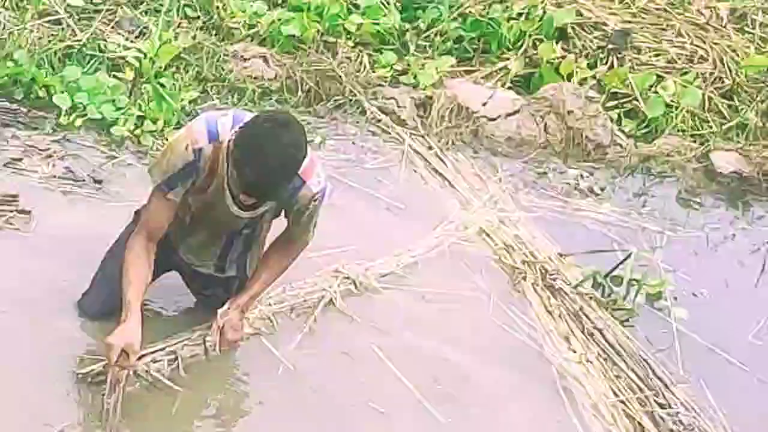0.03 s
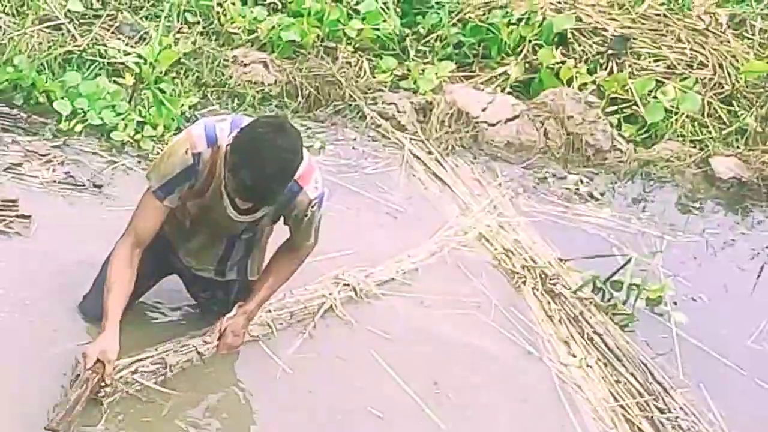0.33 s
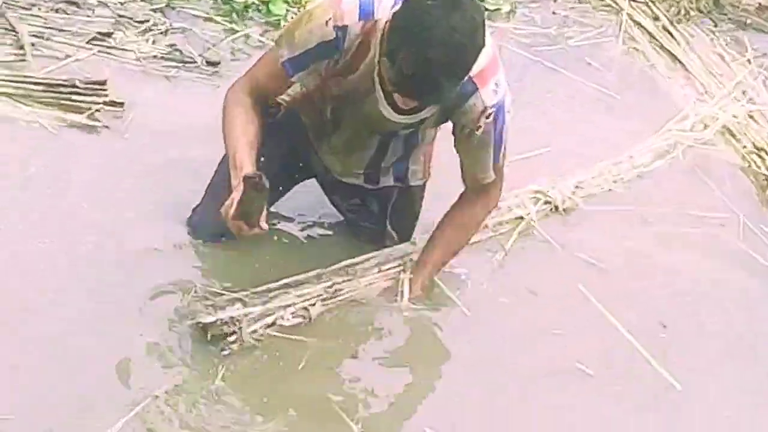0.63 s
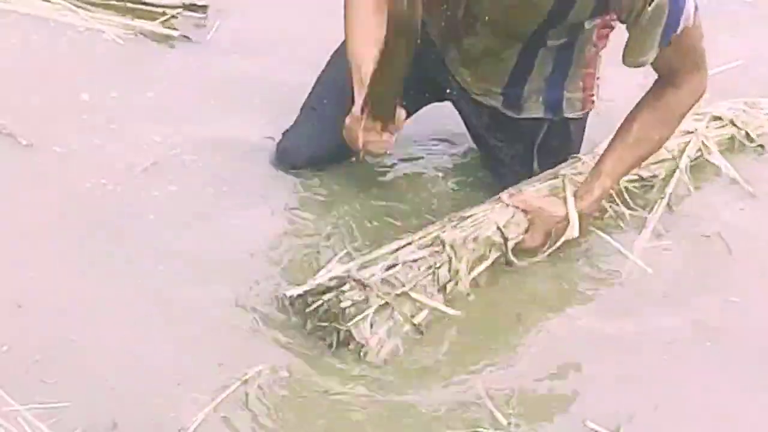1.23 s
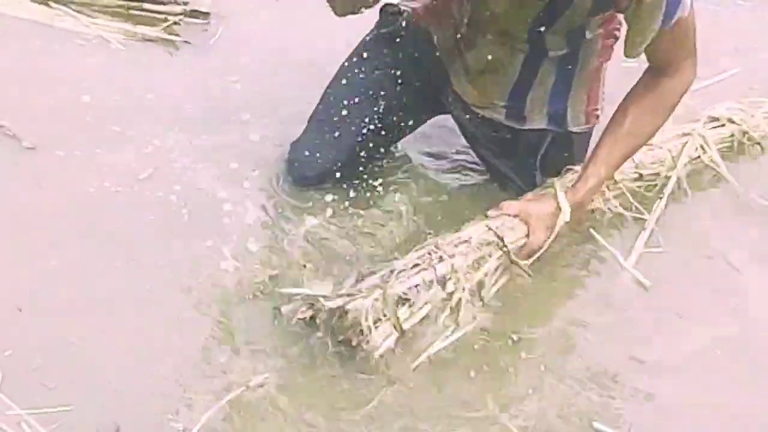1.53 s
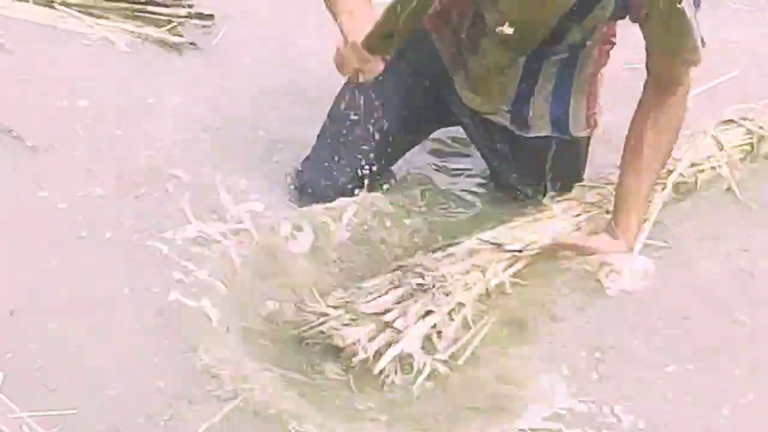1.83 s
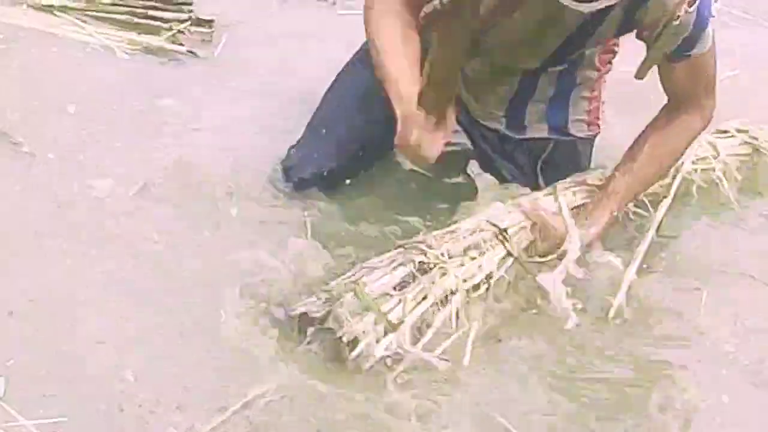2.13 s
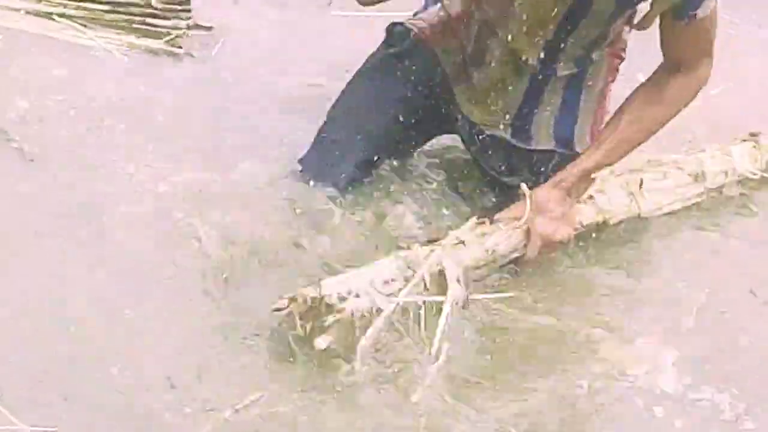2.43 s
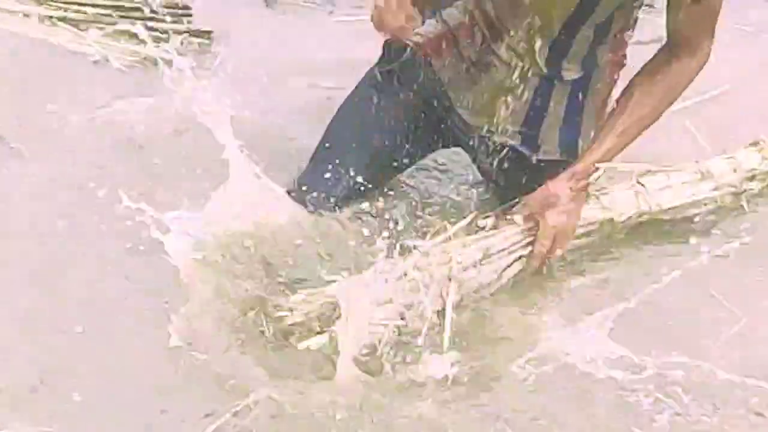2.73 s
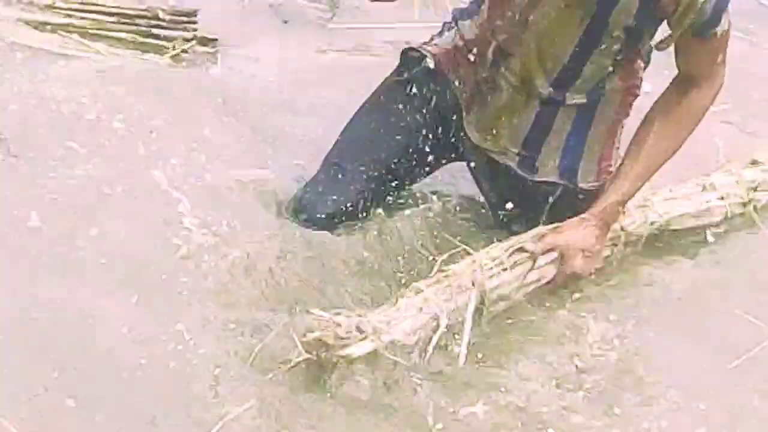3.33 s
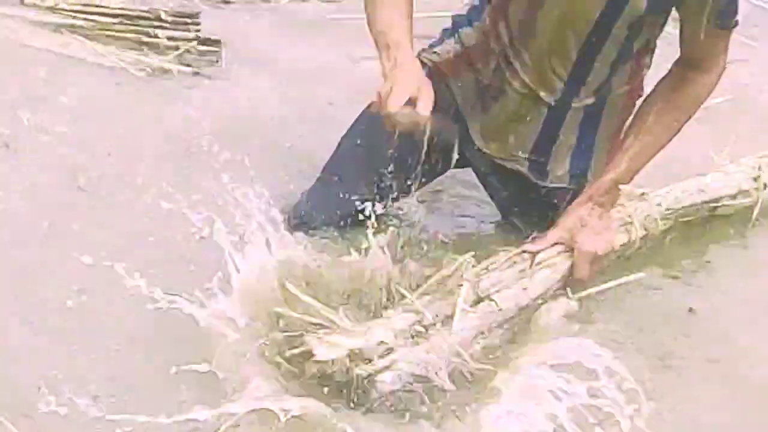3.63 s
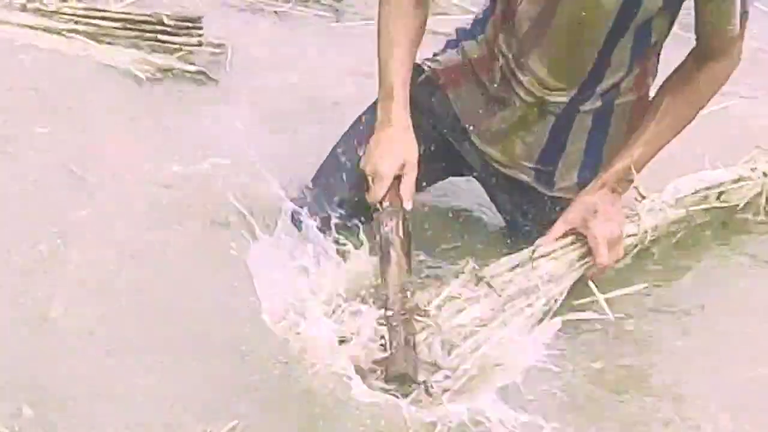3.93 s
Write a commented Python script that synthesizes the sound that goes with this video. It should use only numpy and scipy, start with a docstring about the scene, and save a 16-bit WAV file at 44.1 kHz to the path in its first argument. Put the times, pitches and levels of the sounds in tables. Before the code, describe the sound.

A wooden club whacks a wet bundle of stalks in shallow water seven times, close by outdoors. Each sharp blow throws spray that patters back, and the bundle sloshes between hits. Insects buzz very faintly behind.

```python
"""Clubbing wet stalks in shallow water

A wooden club whacks a wet bundle of stalks seven times, close by. Each blow cracks the stalks,
shoves the water and throws spray that patters back; something far off returns an echo.
Between blows the bundle is turned and sloshes. Two insects buzz on the bank, and a distant bird
calls once over the low rumble of the open air."""
import sys
import numpy as np
from scipy import signal
from scipy.fft import rfft, irfft, next_fast_len
from scipy.io import wavfile
from scipy.ndimage import map_coordinates

SR = 44100
rng = np.random.default_rng(int(sys.argv[2]) if len(sys.argv) > 2 else 0)


def put_to_file(sound):
    """Save the sound as 16-bit audio at rate SR, in the file named by the first command-line argument."""
    columns = np.atleast_2d(sound).T  # one column per channel
    safe = np.clip(columns, -1, 1)
    whole_steps = np.round(safe * 32767)
    wavfile.write(sys.argv[1], SR, whole_steps.astype(np.int16))


N = 176400  # 4 seconds
TOP_HZ = 15900

ATTACK_S, HOLD_S, LEAD_S = 0.00067, 0.0015, 0.0022  # lead: the light touch before the full hit
# Blows of the club: (time [s], water push [dB], air pocket [dB], pocket pitch [Hz],
# wood knock [dB], club pitch [Hz], stalk crack [dB], wet slap [dB])
CLUB_BLOWS = [(1.377, -15.5, -15, 586, -21, 1393, -14.5, -17.5),
              (1.7603, -11, -14, 540, -13, 1483, -15.5, -13), (2.2798, -2, -23, 510, -15.5, 1697, -16, -18),
              (2.6626, -15.5, -14, 714, -16.5, 1622, -15.5, -20),
              (3.2110, -1, -1.5, 579, -16.5, 1535, -13.5, -19.5),
              (3.6090, -4, -6, 552, -22, 1348, -15, -17),
              (3.9766, -15.5, -18.5, 505, -16.5, 1362, -15, -14.5)]
def blows():
    """The club rings, crushes the stalks and shoves the water, which springs back on trapped air."""
    out, t = np.zeros((2, N)), np.arange(SR // 10) / SR - LEAD_S
    push_t = t - 0.00215  # the push peaks just after the hit
    pocket_t = np.maximum(push_t + 0.000065, 0)  # the air starts to ring just before that
    crush = hit_shape(t, fade_s=0.032)
    for s, push_db, pocket_db, pocket_hz, knock_db, club_hz, crack_db, slap_db in CLUB_BLOWS:
        push_shape = np.exp(-abs(push_t) / 0.0011) * ramp(t + LEAD_S, LEAD_S)
        push = amp(push_db) * np.cos(2 * np.pi * 0.52 * pocket_hz * push_t) * push_shape
        pocket = amp(pocket_db) * np.sin(2 * np.pi * pocket_hz * pocket_t) * fade(pocket_t, 0.019)
        # The club's own note shifts with the point of contact.
        ring = amp(knock_db + 4) * np.sin(2 * np.pi * club_hz * t) * hit_shape(t, fade_s=0.023)
        hit = band(push - pocket, 122.6, 5500) + ring
        for low_hz, high_hz, db in [(610, 2210, knock_db), (2490, 5740, crack_db), (7500, 15000, slap_db)]:
            burst = band(stalks(crush), low_hz, high_hz)
            hit = hit + amp(db) * burst * np.linalg.norm(crush) / np.linalg.norm(burst.mean(0))
        add(out, s - LEAD_S, hit)
    return out


def hit_shape(t, fade_s):
    """Loudness of one hit: a light touch, a fast rise, a short hold and a fade."""
    touch = amp(-24) * (t < ATTACK_S) * (1 + t / LEAD_S)
    return touch + ramp(t, ATTACK_S) * fade(np.maximum(t - HOLD_S, 0), fade_s)


# Where club and bundle ring: (pitch [Hz], width [Hz], level [dB])
WOOD_RINGS = [(805, 820, 5), (1820, 285, 6), (2700, 250, 4.5), (3507, 790, 7), (4210, 175, 3),
              (6230, 250, 5), (9690, 3530, 14), (11800, 1500, -12)]
def stalks(loudness):
    """A burst of tiny breaks rings in the club and the bundle."""
    breaks = rng.standard_normal((2, len(loudness))) * loudness
    return spread(filtered(breaks, lambda f: amp(-12.5) + resonances(WOOD_RINGS)(f)))


def echo():
    """The sharp start of each blow comes back from afar as one short tick."""
    out, t = np.zeros(N), np.arange(-SR // 100, SR // 100) / SR
    delay_s, pitch_hz = 0.0603, 2550
    tick = np.sin(2 * np.pi * pitch_hz * t) * np.exp(-(t / 0.00081) ** 2)
    for s, *_, crack_db, slap_db in CLUB_BLOWS:
        add(out, s + delay_s + t[0], amp(crack_db - 11.5) * tick)
    return out


# Tone of the flying spray: (frequency [Hz], level [dB])
SPRAY_TONE = [(200, -8), (520, 9), (970, -4.5), (1500, 4.5), (2200, 0.5), (3500, 3), (5000, -8.5),
              (9600, -5), (16000, -12)]
def spray():
    """Each blow throws up a sheet of water that tears apart with a hiss."""
    t = clock()
    thrown = sum(ramp(t - s, 0.0005) * fade(abs(t - s), 0.27) for s, *_ in CLUB_BLOWS)
    tearing = crackle(N, per_s=6000, size_db=3.2) * amp(2 * wobble(130))
    return amp(-29.5) * thrown * unit(spread(filtered(tearing, tone(SPRAY_TONE))))


# Clumps of falling drops: (time [s], level [dB], spread [s])
DROP_SHOWERS = [(1.532, -58, 0.025), (1.981, -52, 0.17), (2.418, -52.5, 0.11), (2.96, -53, 0.29),
                (3.4, -54, 0.072), (3.801, -50, 0.063)]
# Tone of drops and froth: (frequency [Hz], level [dB])
PATTER_TONE = [(200, -36), (500, -4), (1500, -5.5), (2400, -4), (3700, -3.5), (6000, -10.5), (10000, -5),
               (16000, -16)]
def falling_drops():
    """The spray falls back in clumps of drops, while small waves lap and gurgle."""
    t = clock()
    falling = np.sqrt(sum(amp(2 * db) * np.exp(-((t - s) / width) ** 2) for s, db, width in DROP_SHOWERS))
    spatter = crackle(N, per_s=2600, size_db=3.8) * amp(2 * wobble(35) + 2.2 * wobble(140))
    patter = unit(spread(filtered(spatter, tone(PATTER_TONE))))
    ticks = amp(-8) * bubble_swarm(N, hz=4030, per_s=60, octaves=0.32)
    # Drips and laps carry on faintly between showers.
    drips = amp(-10.5) * (falling + amp(-72)) * bubble_swarm(N, hz=1457, per_s=95, octaves=0.563)
    laps = bubble_swarm(N, hz=346.4, per_s=45, octaves=0.21, cycles=5.3)
    return falling * (patter + ticks) + drips + amp(-12.5) * (falling + amp(-56)) * laps


# Moves of the bundle in the water: (time [s], level [dB], rough spread [s], bubble pitch [Hz])
BUNDLE_MOVES = [(0.735, -51, 0.0072, 900), (1.948, -43, 0.006, 3500), (1.975, -49.5, 0.0088, 1530),
                (2.038, -33.5, 0.0088, 740), (2.014, -53, 0.0076, 1070), (2.079, -42.5, 0.008, 2030),
                (2.335, -42.5, 0.047, 271), (2.967, -42, 0.014, 2320), (3.003, -35.5, 0.0069, 1075),
                (3.042, -44.5, 0.017, 1223), (3.118, -44, 0.013, 404)]
def sloshes():
    """Turning the bundle stirs up swarms of bubbles and some froth."""
    out, n = np.zeros((2, N)), SR // 4
    t = np.arange(n) / SR
    middle_s = t[-1] / 2
    for s, db, width, hz in BUNDLE_MOVES:
        swell = np.exp(-abs(t - middle_s) / (1.29 * width))
        froth = unit(spread(filtered(crackle(n, per_s=5800, size_db=3.0), tone(PATTER_TONE))))
        bubbles = bubble_swarm(n, hz, per_s=1000, octaves=0.554, cycles=1.66)
        water = swell * (bubbles + amp(-4.5) * froth)
        add(out, s - middle_s, amp(db) * unit(water) * rms(swell))
    return out


# Bubbles heard one by one; the first row is the ring of a stalk tap and the row at 1.039 s a small tick #
# before the blows: (time [s], level [dB], pitch [Hz], pitch rise [Hz/s], time to peak [s])
BIG_BUBBLES = [(.7055, -41, 930, -9000, 0.0028), (.729, -48, 335, 500, 0.016),
               (.742, -49.5, 490, 20000, 0.011), (1.039, -49, 1480, 2998.5, 0.0026),
               (2.031, -34.5, 246, 1998, 0.0063), (2.032, -40, 654, 3000, 0.0046),
               (2.043, -37, 900, 5000, 0.0033), (2.237, -50.5, 1295, 8000, 0.0096),
               (2.738, -34.5, 895, 8005, 0.0032), (2.959, -27, 1420, 9000, 0.00086)]
def big_bubbles():
    """A few large bubbles plop as the bundle turns; the first row is instead the short, falling ring of the
    stalk tap at 0.706 s, and the row at 1.039 s is a small tick before the blows."""
    out, t = np.zeros(N), np.arange(SR // 4) / SR
    for s, db, hz, rise, peak_s in BIG_BUBBLES:
        cut_tail = np.exp(-(t / (4 * peak_s)) ** 4)
        add(out, s, amp(db) * bubble(t, hz, rise, peak_s) * cut_tail)
    return out


def bubble(t, hz, rise, peak_s):
    """A bubble rings and rises in pitch as it nears the surface."""
    return np.sin(2 * np.pi * (hz * t + rise * t * t / 2)) * t / peak_s * np.exp(1 - t / peak_s)


def bubble_swarm(n, hz, per_s, octaves, cycles=2.1):
    """Small bubbles ring at random around one pitch, each loudest after `cycles` vibrations."""
    count, t = max(int(per_s * n / SR), 1), np.arange(SR // 40) / SR
    starts, chance = rng.integers(0, n, (count, 1)), rng.standard_normal((count, 2))
    pitch = np.minimum(hz * 2 ** (octaves * chance[:, :1]), TOP_HZ / 2)
    gain = amp(4 * np.minimum(chance[:, 1:], 1))
    peak_s = cycles / pitch
    rings = gain * bubble(t, pitch, 0.02 * pitch / peak_s, peak_s) * (1 - t / t[-1])
    places = (starts + np.arange(len(t))) % n
    return unit(np.bincount(places.ravel(), rings.ravel(), n))


# Small snaps and taps: (time [s], level [dB], brightness [dB/octave])
STALK_TAPS = [(.105, -56, -30), (0.7058, -31.5, -3), (.916, -54.5, -22), (0.962, -47, 14),
              (0.978, -42, -9.5), (1.704, -48.5, -9.5), (3.538, -43, -3), (3.958, -32.5, 7)]
def taps():
    """Light touches make the stalks snap, each with a faint tail."""
    out, t = np.zeros((2, N)), np.arange(SR // 10) / SR
    loudness = ramp(t, ATTACK_S) * fade(t, 0.027) + amp(-22) * fade(t, 0.87)
    for s, db, brightness in STALK_TAPS:
        snap = band(stalks(loudness), 1280, 10000)
        tap = filtered(snap, lambda f: amp(brightness * np.log2((f + 500) / 3000)))
        add(out, s, amp(db) * unit(tap) * rms(loudness))
    return out


# Where the first insect's wings ring: (pitch [Hz], width [Hz], level [dB])
TRILL_WINGS = [(5450, 350, -18.5), (8300, 350, -6), (8580, 166, 1.5), (11500, 380, -10)]
def trilling_insect():
    """One insect rubs its wings without a pause."""
    return amp(-62) * buzz(TRILL_WINGS, strokes_per_s=138, left_db=6.5)


# Where the second insect's wings ring: (pitch [Hz], width [Hz], level [dB])
CHIRP_WINGS = [(10690, 390, 0)]
# Its chirps: (start [s], end [s])
CHIRP_TIMES = [(-.08, 0.1), (0.13, 0.34), (0.36, 0.58), (0.624, 0.85), (.97, 1.04), (1.57, 1.71),
               (2.064, 2.217), (2.52, 3.3), (3.347, 3.505)]
def chirping_insect():
    """The other insect buzzes in chirps that swell and fade."""
    t = clock()
    chirps = sum(ramp(t - start, 0.059) * ramp(end - t, 0.023) for start, end in CHIRP_TIMES)
    return amp(-67) * chirps * buzz(CHIRP_WINGS, strokes_per_s=112, left_db=17.5)


def buzz(rings, strokes_per_s, left_db):
    """Fast, even strokes and some rasp make an insect's wings ring."""
    stroke_count = np.cumsum(strokes_per_s * (1 + 0.003 * wobble(6))) / SR
    strokes = unit(np.diff(np.floor(stroke_count), prepend=0))
    rasp = 0.8 * rng.standard_normal((2, N))
    wing = lambda f: sum(amp(db) * resonances([(hz, 1.5 * width, 0)])(f) ** 2 for hz, width, db in rings)
    return unit(filtered(strokes + rasp, wing)) * amp([[left_db / 2], [-left_db / 2]])


def bird():
    """A distant bird gives a quick run of seven rising notes."""
    out, t = np.zeros(N), np.arange(SR // 40) / SR
    rise_hz_per_s = 30300
    for s in 0.098 + 0.03 * np.arange(7):
        hz = 2850 * rng.normal(1, 0.025)
        note = np.sin(2 * np.pi * (hz * t + rise_hz_per_s * t * t / 2))
        add(out, s, amp(-60) * np.hanning(len(t)) * note)
    return out


# Tones of the outdoor rumble and hiss: (frequency [Hz], level [dB])
RUMBLE_TONE = [(20, -0.5), (100, -7), (200, -14.5), (350, -22.5), (550, -27), (1200, -59), (4000, -83)]
HISS_TONE = [(200, -11), (700, 1), (1400, -4), (3200, 0.5), (4400, -4), (6400, -7), (9800, 4.5),
             (13000, -9.5), (16000, -7.5)]
def outdoors():
    """The open air rumbles and hisses faintly, both wavering a little in level."""
    shared, side = filtered(rng.standard_normal((2, N)), tone(RUMBLE_TONE))
    rumble = unit(np.array([shared + 0.43 * side, shared - 0.054 * side])) * amp(-52.5 + 1.2 * wobble(7))
    hiss = amp(-61.5 + 1.2 * wobble(0.43)) * unit(filtered(rng.standard_normal((2, N)), tone(HISS_TONE)))
    return rumble + hiss


def amp(db):
    """Turn decibels into a gain."""
    return 10 ** (np.asarray(db) / 20)


def rms(x):
    """Average strength of a signal."""
    return np.sqrt(np.mean(x ** 2) + 1e-20)


def unit(x):
    """Scale to an average strength of 1."""
    return x / rms(x)


def clock():
    """Time of every sample."""
    return np.arange(N) / SR


def ramp(t, seconds):
    """Rise from 0 to 1 in this many seconds."""
    return np.clip(t / seconds, 0, 1)


def fade(t, seconds):
    """Fall by 60 dB in this many seconds."""
    return amp(-60 * t / seconds)


def tone(points):
    """A gain curve through (frequency, level) points."""
    hz, db = np.transpose(points)
    return lambda f: amp(np.interp(np.log(f + 1), np.log(hz), db))


def resonances(rings):
    """A gain curve that rings at each (pitch, width, level)."""
    return lambda f: sum(amp(db) * 1j * f * w / (hz * hz - f * f + 1j * f * w) for hz, w, db in rings)


def filtered(x, curve):
    """Shape the frequencies of x with a gain curve."""
    n = x.shape[-1]
    padded = next_fast_len(n + 4096)
    return irfft(rfft(x, padded) * curve(np.fft.rfftfreq(padded, 1 / SR)), padded)[..., :n]


def band(x, low_hz, high_hz):
    """Keep what lies between two frequencies."""
    return signal.sosfilt(signal.butter(3, [low_hz, high_hz], 'band', fs=SR, output='sos'), x)


def wobble(per_s):
    """A smooth random curve."""
    return map_coordinates(rng.standard_normal(int(N * per_s / SR) + 4), [clock() * per_s])


def crackle(n, per_s, size_db):
    """Two streams of random clicks of very unequal size."""
    clicks = (rng.random((2, n)) < per_s / SR) * rng.standard_normal((2, n))
    return unit(clicks * amp(size_db * np.minimum(rng.exponential(size=(2, n)), 3)))


def spread(pair):
    """Make left and right: alike in the bass, less so in the treble."""
    side = filtered(pair[1], lambda f: amp(-0.5) * f / np.hypot(f, 2400))
    return np.array([pair[0] + side, pair[0] - side])


def add(out, s, x):
    """Mix x into out at time s."""
    i = max(round(s * SR), 0)
    out[..., i:i + x.shape[-1]] += x[..., :max(N - i, 0)]


# How much louder the work is on the left: (frequency [Hz], left over right [dB])
LEFT_BALANCE = [(100, 1.5), (500, 0.5), (800, 4), (1200, -1.5), (1800, -1), (2700, -0.5), (4200, 8),
                (6400, 12), (9800, -2.5), (15000, 8.5)]
def scene():
    """The work reaches two microphones with a different tone and a slight lag; the bank sounds join it."""
    work = blows() + echo() + spray() + falling_drops() + sloshes() + big_bubbles() + taps()
    sides, left_lag_s = np.array([[0.5], [-0.5]]), 0.00008
    mics = lambda f: tone(LEFT_BALANCE)(f) ** sides * np.exp(-2j * np.pi * f * left_lag_s * sides)
    return filtered(work, mics) + trilling_insect() + chirping_insect() + bird() + outdoors()


def record(dry):
    """The sound opens after a brief hush, its highest peaks are rounded off and the top treble is cut."""
    opened = dry * np.clip((clock() - 0.05) / 0.005 + 1, 0.03, 1)
    rounded = opened / (1 + abs(opened / 0.94) ** 8) ** (1 / 8)
    return filtered(rounded, lambda f: f < TOP_HZ)


dry = scene()
out = record(dry)
put_to_file(out)
```